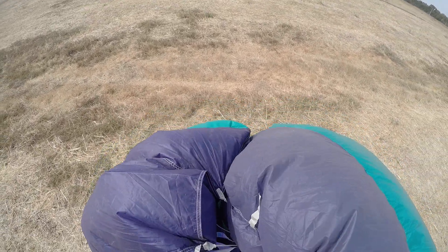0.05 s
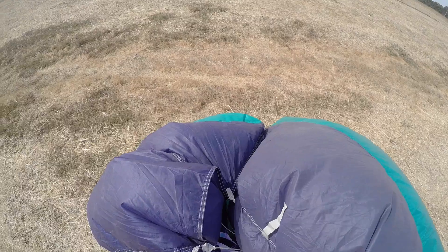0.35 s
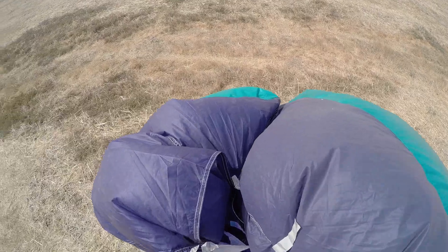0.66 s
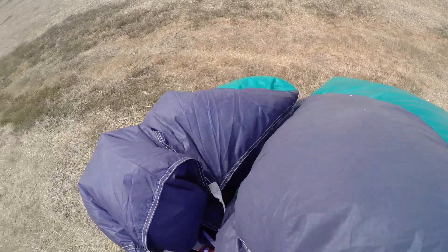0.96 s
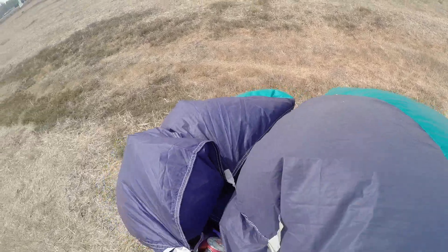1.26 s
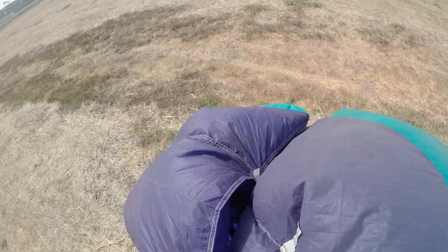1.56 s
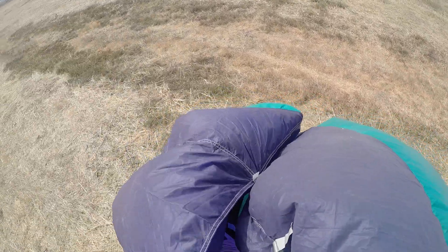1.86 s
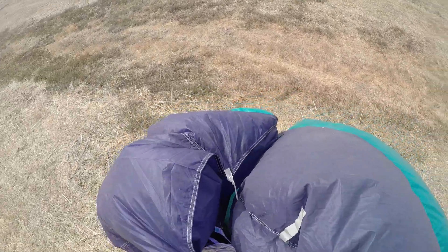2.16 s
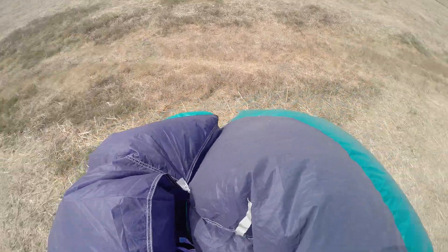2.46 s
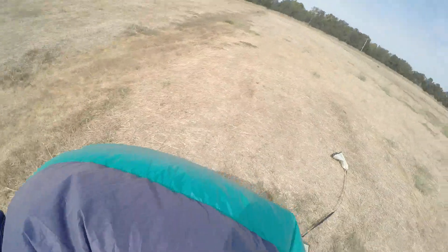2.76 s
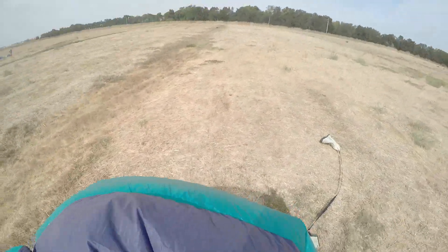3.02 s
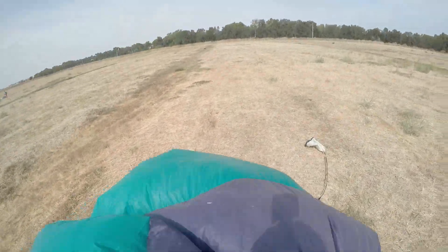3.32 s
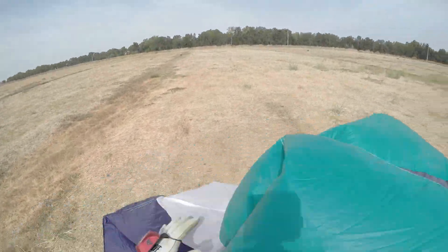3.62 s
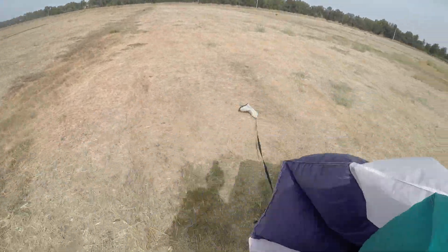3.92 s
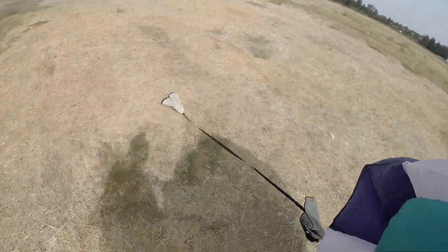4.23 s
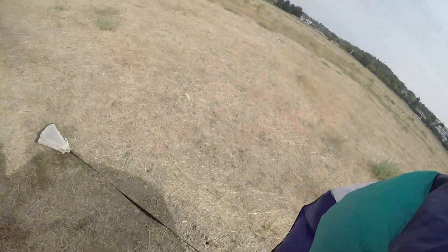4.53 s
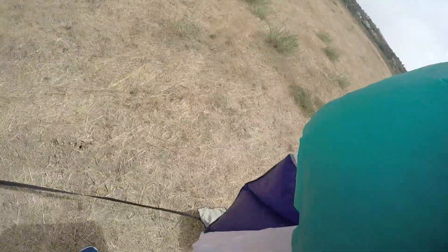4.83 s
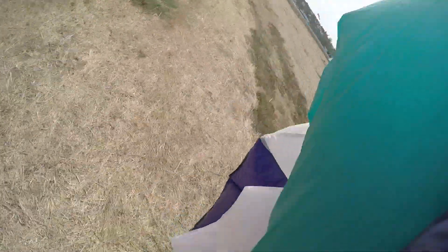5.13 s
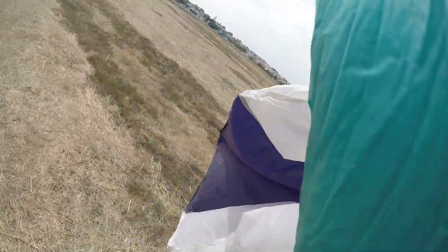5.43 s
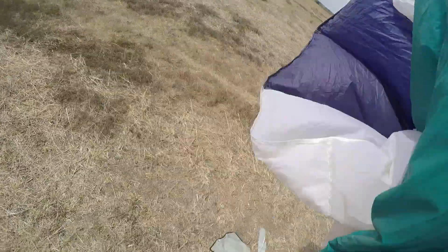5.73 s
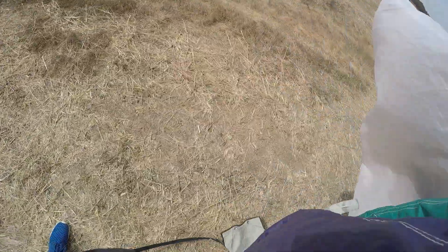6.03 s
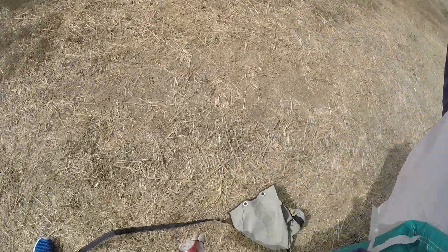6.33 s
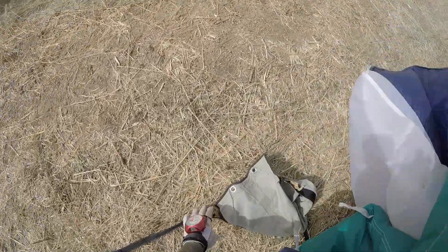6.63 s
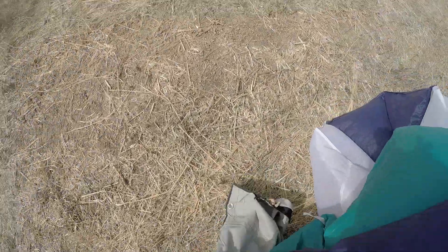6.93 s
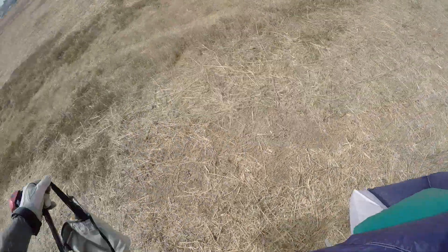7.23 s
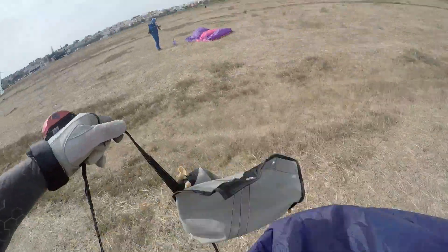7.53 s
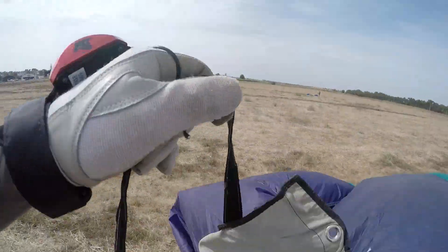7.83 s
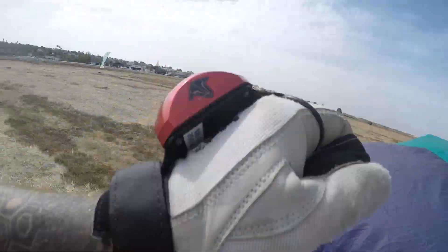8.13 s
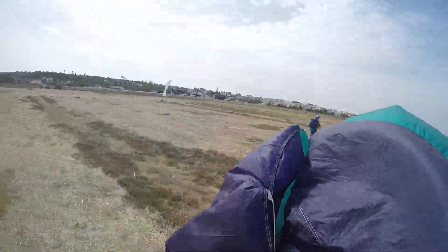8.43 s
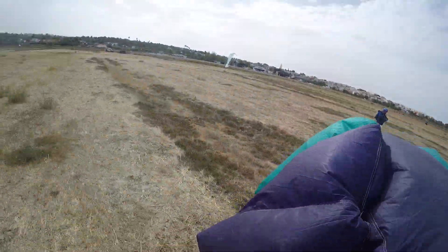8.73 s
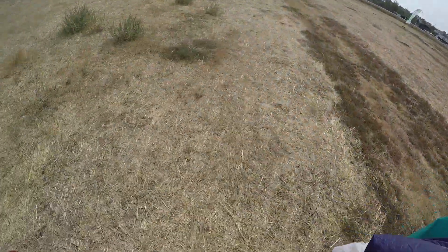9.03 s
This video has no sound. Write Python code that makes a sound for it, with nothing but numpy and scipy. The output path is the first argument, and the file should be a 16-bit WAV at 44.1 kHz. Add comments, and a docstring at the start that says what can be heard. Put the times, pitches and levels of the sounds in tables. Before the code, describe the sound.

Wind buffets the microphone while parachute cloth is gathered up, swishing, crackling and once knocking loudly against the camera.

```python
"""On a dry field, a nylon parachute is gathered up, heard from a small body-worn camera.
The cloth rustles as it slides, crinkles as it buckles, and zips as it rubs on cloth and cord.
Folds bump the camera and set its case and mount ringing; the hardest bump overloads the microphone,
and the cloth then drags across the case. Wind buffets the microphone and sings faintly in the
parachute's lines, over the soft hiss of the open field."""
import sys
import numpy as np
from scipy import signal
from scipy.fft import rfft, irfft, next_fast_len
from scipy.io import wavfile
from scipy.ndimage import uniform_filter1d

SR = 44100
rng = np.random.default_rng(int(sys.argv[2]) if len(sys.argv) > 2 else 0)


def wrap_up_sound(samples):
    """Save the sound to the file named by the first command line argument, as 16-bit audio."""
    columns = np.atleast_2d(samples).T
    # keep every value between -1 and 1, then stretch to whole-number steps
    tamed = np.clip(columns, -1, 1)
    steps = np.round(tamed * 32767).astype(np.int16)
    wavfile.write(sys.argv[1], SR, steps)


N = 399987
T = np.arange(N) / SR
FFT_SIZE = next_fast_len(N, real=True)
HZ = np.fft.rfftfreq(FFT_SIZE, 1 / SR)


# The tone of sliding cloth, crisp crumpling and thick folds.
# Each row: frequency in Hz, relative level in dB.
SLIDE_TONE = [(500, -27), (1100, -9), (1700, 0), (2100, -3.5), (2500, 2), (3200, -6), (4000, -13.5),
              (5000, -26), (7000, -17.5), (15000, -40.5)]
CRISP_TONE = [(1500, -32), (3000, -1.5), (4200, -1.5), (5500, 0), (7000, -7.5), (8500, -8), (10000, -12.5),
              (12500, -15.5), (15000, -25)]
FOLD_TONE = [(150, -2.5), (300, -1.5), (500, 4.5), (750, -1), (1100, 7.5), (1400, 6), (2000, -4),
             (4000, -41)]

def cloth():
    """Sliding nylon hisses and buckles; taut cloth is crisp, thick bundles sound deep."""
    slide_db, crisp_db, fold_db = cloth_levels()
    clicks = buckles(per_s=800, spread_db=4)
    case_db = case_resonance_db()
    # smooth sliding is steady; crisp crumpling sticks and slips, shaking all three sounds at once
    slip_db = wander(hz=70) * np.interp(crisp_db - slide_db, [-11, 0], [0.5, 1.7])
    slide = colour(noise() + 0.5 * clicks, SLIDE_TONE, case_db) * amp(slide_db + slip_db)
    crisp = colour(noise() + 0.5 * clicks, CRISP_TONE, case_db) * amp(crisp_db + 0.86 * slip_db)
    folds = colour(noise() + 0.34 * clicks, FOLD_TONE) * amp(fold_db + 0.86 * slip_db)
    return slide + crisp + folds


# How briskly the cloth is handled, in two lists: before and after it drags over the case.
# Each row: time in seconds, briskness in dB.
HANDLING = [
    [(0.0, -65.5), (0.53, -66), (0.82, -63.5), (2.45, -67), (3.24, -63.5), (3.38, -59.5), (4.38, -62.5),
     (5.18, -57)],
    [(5.47, -57), (5.73, -59.5), (6.22, -57.5), (6.52, -60.5), (7.54, -60), (8.13, -64.5), (8.73, -59.5),
     (9.07, -64)],
]
# Armfuls pulled in. Each row: middle and length in seconds, then the levels in dB of sliding,
# crisp crumpling and thick folds.
ARMFULS = [(0.223, 0.19, -73, -61.5, -80), (0.886, 0.81, -60.5, -64, -82), (1.69, .07, -60.5, -65, -80),
           (1.899, 0.095, -64, -57, -76), (2.9, 0.26, -64, -62, -69), (3.326, 0.34, -55, -55.5, -57),
           (3.472, 0.29, -62, -62, -72), (3.85, 0.31, -58.5, -58.5, -67), (4.794, 0.067, -61, -63, -60),
           (5.563, 0.29, -48.5, -77, -55.5), (6.022, .22, -55, -64, -58), (6.832, 0.11, -57, -65, -69),
           (7.187, 0.27, -55.5, -75, -56), (7.63, 0.41, -60, -65, -72), (7.81, 0.12, -63, -70, -60.5),
           (8.556, .08, -71, -70, -62), (8.82, 0.21, -70, -69, -61.5)]

def cloth_levels():
    """Sliding, crumpling and folds, in dB: all grow with brisker handling and swell with each armful."""
    ordinary_db = -62
    brisk_db = follow(np.vstack(HANDLING))[0] - ordinary_db
    slide_db, crisp_db, fold_db = -61.5 + 1.6 * brisk_db, -65.5 + brisk_db, -67.5 + 1.6 * brisk_db
    power = amp([slide_db, crisp_db, fold_db]) ** 2
    for middle, length, *levels_db in ARMFULS:
        power += np.outer(amp(levels_db), swell(middle, length)) ** 2
    return 10 * np.log10(power)


# Single creases that snap. Each row: start in seconds, strength in dB, brightness in dB.
CREASE_SNAPS = [(0.7347, -46.5, 0), (0.8814, -49, -4), (0.944, -43, -11), (1.6833, -50, -12),
                (2.6519, -47.5, -26), (3.2919, -33.5, -27), (3.4096, -34, -13), (3.482, -41.5, -13),
                (3.766, -41, -5.5), (5.1167, -39, -26), (5.423, -27, -4), (5.7445, -39.5, -9.5),
                (7.624, -36, -13.5), (8.852, -42.5, -21)]

def creases():
    """A crease lets go in a burst of noise a few milliseconds long."""
    t = np.arange(SR // 20) / SR
    burst = (np.exp(-t / 0.0028) + 0.1 * np.exp(-t / 0.0072)) * (1 - np.exp(-t / 0.00044))
    body, edge = np.zeros(N), np.zeros(N)
    for start, db, bright_db in CREASE_SNAPS:
        add(body, start, amp(db - 1) * burst * noise(len(t)))
        add(edge, start, amp(db + bright_db + 4) * burst * noise(len(t)))
    body = signal.sosfilt(signal.butter(2, [2800, 5000], "band", fs=SR, output="sos"), body)
    edge = signal.sosfilt(signal.butter(2, [4500, 9000], "band", fs=SR, output="sos"), edge)
    return filtered(body + edge, amp(case_resonance_db()))


# Short rubs of cloth and cord. Each row: middle and length in seconds, level in dB, pitch in Hz,
# wobble as a share of the pitch.
RUBS = [(3.357, 0.078, -54.5, 1250, 0.2), (6.25, 0.71, -66.5, 6200, 0.093),
        (6.352, 0.14, -51.5, 2460, 0.09), (6.374, .2, -53.5, 469, 0.34), (6.488, 0.13, -53.5, 2406, 0.067),
        (6.642, 0.15, -54.5, 2347, 0.042), (6.962, 0.058, -49, 2440, 0.05),
        (7.222, 0.091, -51, 2460, 0.047)]

def zips():
    """Threads tick across each other as a rub swells and fades; a faster pull sings higher."""
    out, drift = np.zeros(N), wander(hz=460)
    for middle, length, db, hz, wobble in RUBS:
        out += amp(db) * swell(middle, length) * fuzzy_tone(hz * (1 + wobble * drift), octave_db=-22)
    return out


# Folds hitting the camera. Each row: start in seconds, force in dB, contact time in milliseconds,
# push on the mount in dB.
BLOWS = [(4.588, -49, 0.089, -25.5), (4.9646, -44, 0.44, -23.5), (5.2036, -28, 0.17, -44),
         (5.2152, -2, 0.055, -11.5), (5.2174, -12.5, 0.17, -17), (5.629, -44, 0.041, -25.5),
         (5.981, -39, 0.036, -28), (7.247, -69, .8, -30.5)]
# The notes the case rings with. Each row: pitch in Hz, relative level in dB, seconds to fade by 60 dB.
CASE_NOTES = [(133, -7.5, 0.081), (173, 0, 0.026), (537, 2.5, 0.02), (698, -6, 0.011), (918, -13.5, 0.041),
              (1347, 2, 0.022), (1756, -0.5, 0.02), (2060, 0, 0.014), (2357, 3.5, 0.015),
              (2720, -2.5, 0.018), (3880, -8, 0.024), (4600, -6, 0.013), (5640, -9.5, 0.0058),
              (7630, -10, .005)]
MOUNT_HZ, MOUNT_FADE_S = 97.1, 0.16

def bumps():
    """Each blow rings the case briefly and rocks the camera on its mount; soft blows are dull."""
    t, out = np.arange(SR // 3) / SR, np.zeros(N)
    case = sum(amp(db - 60 * t / fade) * np.cos(2 * np.pi * hz * t) for hz, db, fade in CASE_NOTES)
    case *= 1 + 0.86 * np.exp(-(t / 0.0033) ** 2)  # starts strong, then the landing cloth smothers it
    mount = amp(-60 * t / MOUNT_FADE_S) * np.sin(2 * np.pi * MOUNT_HZ * t)
    for start, force_db, contact_ms, push_db in BLOWS:
        contact = t * np.exp(-t * 1000 / contact_ms)
        ring = signal.fftconvolve(case, contact / contact.sum())[:len(t)]
        add(out, start, amp(force_db) * ring + amp(push_db) * mount)
    overloaded = np.tanh(out)  # the hardest blow overloads the microphone, rounding off the crack
    return signal.sosfilt(signal.butter(2, 9060, "lowpass", fs=SR, output="sos"), overloaded)


# Cloth dragged over the case. Each row: time in seconds, level in dB, pitch of the zip in Hz.
DRAG_PATH = [(5.222, -36, 2500), (5.245, -29, 2500), (5.3, -32.5, 2550), (5.352, -24, 2600),
             (5.38, -29.5, 3050), (5.405, -30, 2750), (5.427, -30, 2600), (5.434, -43, 2500),
             (5.48, -48, 2500)]
# The tone of its scrape. Each row: frequency in Hz, relative level in dB.
SCRAPE_TONE = [(250, -14), (500, -12.5), (1200, -5.5), (2000, -2), (2800, -4.5), (3900, -3.5), (5000, -14),
               (6500, -15.5), (8500, -20.5), (11500, -28), (15000, -26)]

def drag():
    """Cloth scrapes over the case in gritty slips; it zips under pressure, higher as it slides faster."""
    level_db, hz = follow(DRAG_PATH)
    scrape = colour(noise() + 0.8 * buckles(per_s=2000, spread_db=3), SCRAPE_TONE)
    zip_tone = fuzzy_tone(hz + 90 * wander(hz=150), octave_db=-22)
    pressure = amp(level_db - level_db.max())
    touching = (T > DRAG_PATH[0][0]) & (T < DRAG_PATH[-1][0])
    loudness = amp(level_db + 0.48 * wander(hz=116)) * touching
    return (amp(-2) * scrape + pressure ** 0.77 * zip_tone) * loudness


# Resonances of the case around the microphone. Each row: frequency in Hz, width in Hz, lift in dB.
CASE_RESONANCES = [(1840, 280, 2), (2480, 380, 3.5), (3840, 770, 10), (4640, 180, 7), (5840, 200, 3.5),
                   (6270, 290, 3.5), (7060, 180, 7), (7390, 380, -5), (8350, 500, 2.5)]

def case_resonance_db():
    """The peaks and the dip that the case puts on the brighter cloth sounds."""
    return sum(db / (1 + (2 * (HZ - hz) / width) ** 2) for hz, width, db in CASE_RESONANCES)


# Wind at the microphone. Each row: time in seconds, then the relative levels in dB of the slow
# buffeting and of the small fast swirls.
WIND_LEVELS = [(0.0, -44, -64.5), (1.64, -44, -62), (2.27, -48.5, -63.5), (3.28, -40, -57.5),
               (3.66, -47.5, -54.5), (4.37, -42, -67.5), (5.35, -33.5, -36.5), (5.61, -36, -53.5),
               (6.11, -35, -49), (6.24, -28.5, -46), (6.95, -35.5, -56), (9.07, -39.5, -50.5)]
# Gusts and lulls on top of it. Each row: middle and length in seconds, lift of the buffeting in dB.
GUSTS = [(1.448, 0.53, 2), (1.89, 0.16, -4.5), (3.203, 0.12, 4.5), (3.856, 0.53, 4), (4.614, 0.18, 7.5),
         (5.862, 0.12, 10.5), (5.97, .08, -4), (6.096, 0.12, 12), (6.196, 0.2, 7), (7.31, 0.43, 6),
         (7.856, .2, -9), (8.26, 0.094, 5.5)]
# The tone of the buffeting and of the swirls. Each row: frequency in Hz, relative level in dB.
BUFFET_TONE = [(10, -2), (20, 8.5), (32, 6.5), (45, -4.5), (65, -15), (100, -25.5), (200, -57)]
SWIRL_TONE = [(40, -8.5), (70, 1.5), (105, -4), (135, -15), (190, -17.5), (260, -28.5), (400, -31),
              (800, -35), (4000, -73)]

def wind():
    """Large swirls of air thump the microphone; small ones roar and shake the mount."""
    buffet_db, swirl_db = follow(WIND_LEVELS)
    gust_db = sum(db * swell(middle, length) for middle, length, db in GUSTS)
    mount_db = 6 / (1 + ((HZ - MOUNT_HZ) / 10) ** 2)
    buffet = steadied(colour(noise(), BUFFET_TONE), seconds=0.088)
    swirls = steadied(colour(noise(), SWIRL_TONE, mount_db), seconds=0.14)
    buffet *= amp(buffet_db + 2.5 + gust_db)
    swirls *= amp(swirl_db + 5 + 0.27 * gust_db + 1.1 * wander(hz=14))  # gusts lift these less
    return buffet + swirls


# Wind in the parachute's lines. Each row: time in seconds, level in dB, pitch of the thin lines in Hz.
LINE_SONG = [(0, -67.5, 2420), (1.2, -69.5, 2450), (2.1, -66, 2300), (2.4, -65.5, 2320), (2.8, -68.5, 2500),
             (3.3, -74, 2550), (5.5, -65.5, 2550), (6.3, -58, 2450), (7.2, -63.5, 2450), (7.9, -76.5, 2500)]

def singing_lines():
    """Air swirling off taut lines makes two faint hollow tones; thick lines sing lower."""
    level_db, hz = follow(LINE_SONG)
    thin = fuzzy_tone(hz * (1 + 0.035 * wander(hz=196.3)), octave_db=-30)
    thick = fuzzy_tone(0.74 * hz * (1 + 0.0599 * wander(hz=201.4)), octave_db=-28.5)
    return (thin + amp(-2) * thick) * amp(level_db)


# The tone of the open air. Each row: frequency in Hz, relative level in dB.
AIR_TONE = [(100, 15), (500, 2.5), (2500, 2.5), (6000, -5.5), (10000, -10.5), (15000, -13.5)]

def air():
    """Faint even hiss of the open field."""
    return amp(-62.5) * colour(noise(), AIR_TONE)


def buckles(per_s, spread_db):
    """Tiny clicks of buckling cloth: many small, a few large."""
    size = amp(spread_db * np.minimum(rng.exponential(1, N), 4))
    return unit(size * rng.choice([-1, 1], N) * (rng.random(N) < per_s / SR))


def fuzzy_tone(hz, octave_db):
    """Nearly regular ticks of threads or air swirls blur into a fuzzy tone with a weak octave."""
    phase = 2 * np.pi * np.cumsum(hz) / SR
    return unit(wander(hz=258.3) * (np.cos(phase) + amp(octave_db) * np.cos(2 * phase)))


def noise(samples=N):
    """Plain white hiss."""
    return rng.standard_normal(samples)


def wander(hz):
    """Random drift up to a given rate."""
    return unit(filtered(noise(), 1 / (1 + (HZ / hz) ** 4)))


def swell(middle, length):
    """One smooth rise and fall, 0 to 1 and back."""
    return np.cos(np.pi * np.clip((T - middle) / length, -0.5, 0.5))


def steadied(x, seconds):
    """Evens out the slow swells of a noise and leaves its quick ones."""
    return x / np.sqrt(uniform_filter1d(x ** 2, int(seconds * SR)) + 1e-3)


def colour(x, tone, lift_db=0):
    """Shapes x with a tone table, falling steeply beyond its ends; the result has strength 1."""
    hz, db = np.transpose(tone)
    curve_db = np.interp(np.log(HZ + 1), np.log(hz), db)
    roll_off = np.minimum(HZ / hz[0], 1) ** 2 / np.maximum(HZ / hz[-1], 1) ** 2
    return unit(filtered(x, amp(curve_db + lift_db) * roll_off))


def filtered(x, gain):
    """Applies a gain at every frequency."""
    return irfft(rfft(x, FFT_SIZE) * gain, FFT_SIZE)[:N]


def follow(rows):
    """Joins a table's timed rows with straight lines, one curve for each column after the time."""
    times, *columns = np.transpose(rows)
    return [np.interp(T, times, column) for column in columns]


def add(mix, start, sound):
    """Mixes a sound in at a start time in seconds."""
    part = mix[round(start * SR):][:len(sound)]
    part += sound[:len(part)]


def amp(db):
    """Decibels to gain."""
    return 10 ** (np.asarray(db) / 20)


def unit(x):
    """Scales to an average strength (rms) of 1."""
    return x / np.sqrt(np.mean(x ** 2) + 1e-20)


def scene():
    """Everything that reaches the one microphone."""
    return (wind() + singing_lines() + cloth() + creases() + zips() + drag() + bumps() + air())[None]


def record(dry):
    """The camera cuts off the highest treble."""
    lowpass = signal.firwin(511, cutoff=15400, window=("kaiser", 9), fs=SR)
    return signal.oaconvolve(dry, lowpass[None], "same")


dry = scene()
out = record(dry)
wrap_up_sound(out)
```